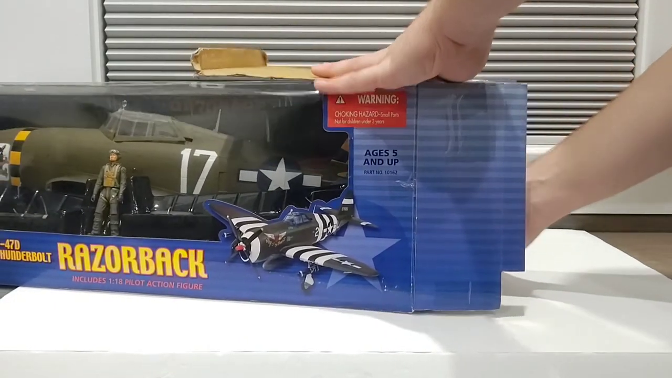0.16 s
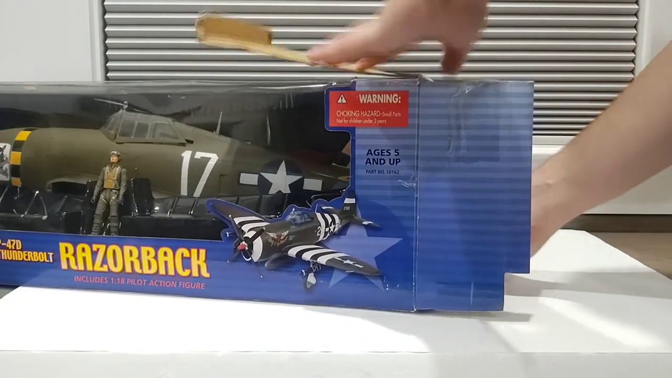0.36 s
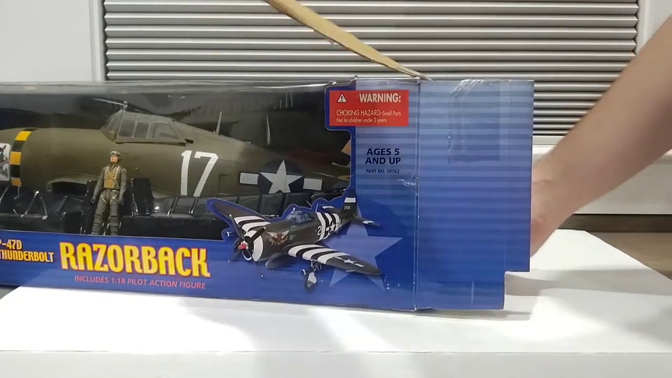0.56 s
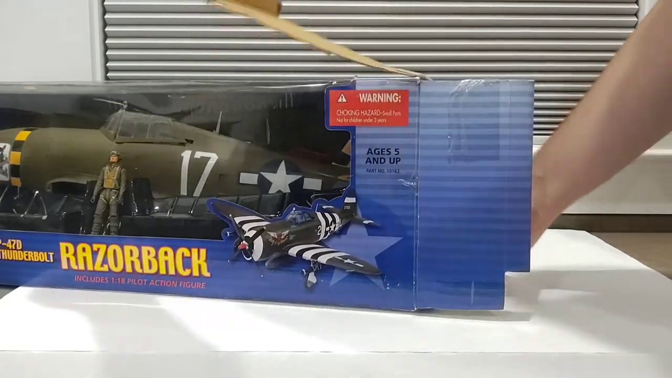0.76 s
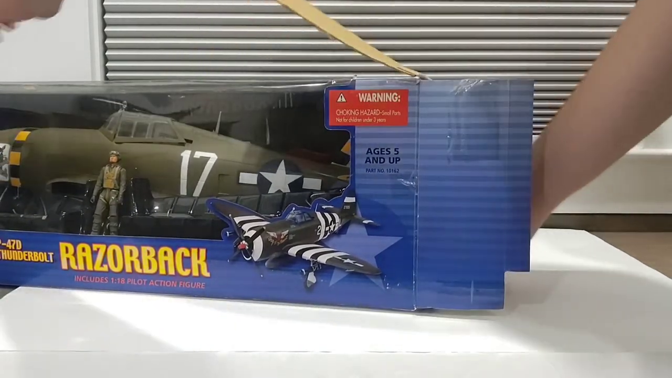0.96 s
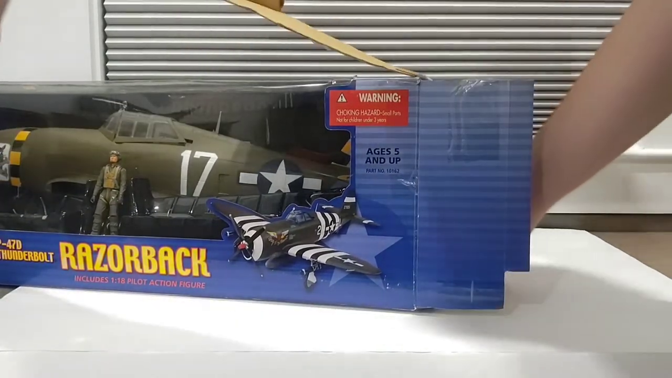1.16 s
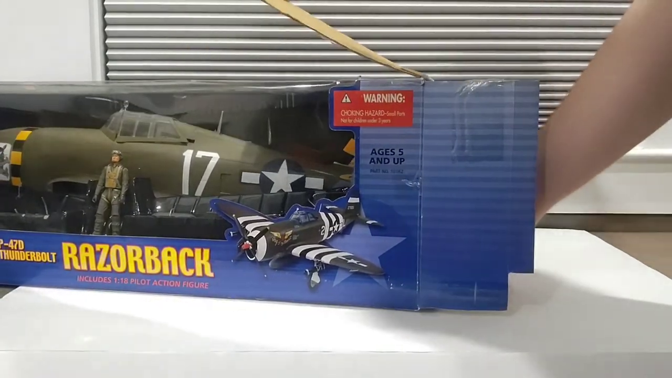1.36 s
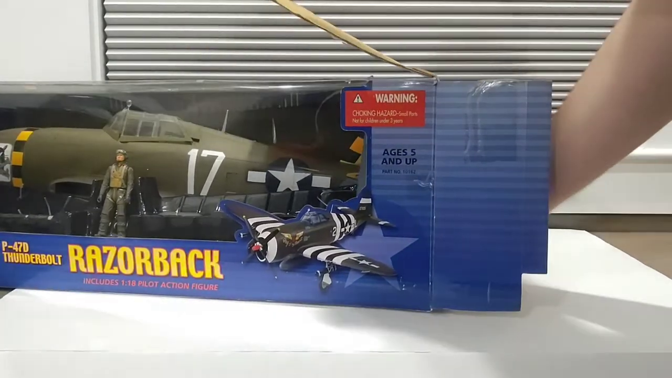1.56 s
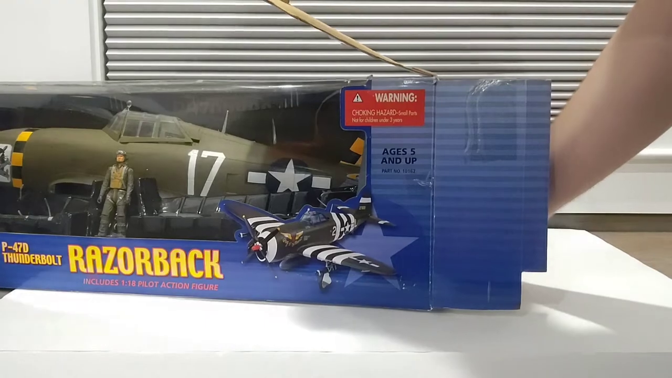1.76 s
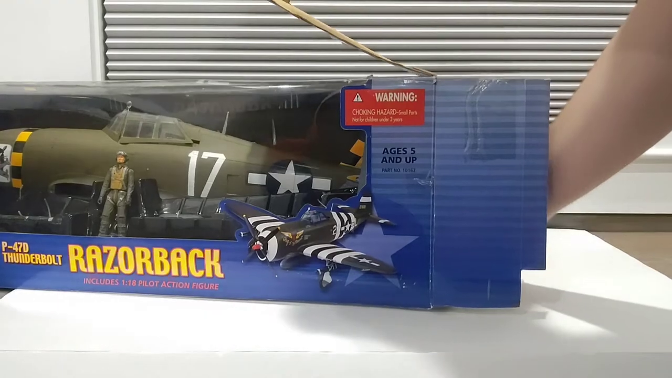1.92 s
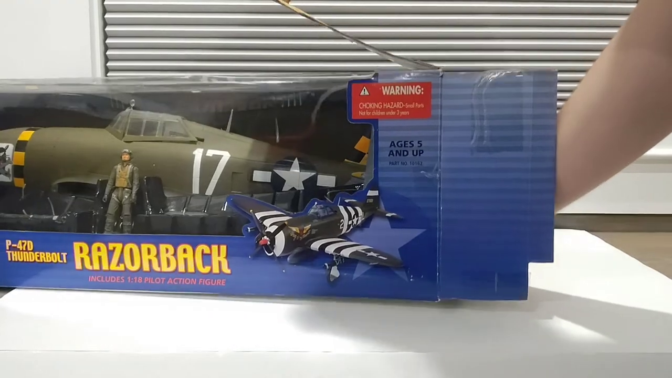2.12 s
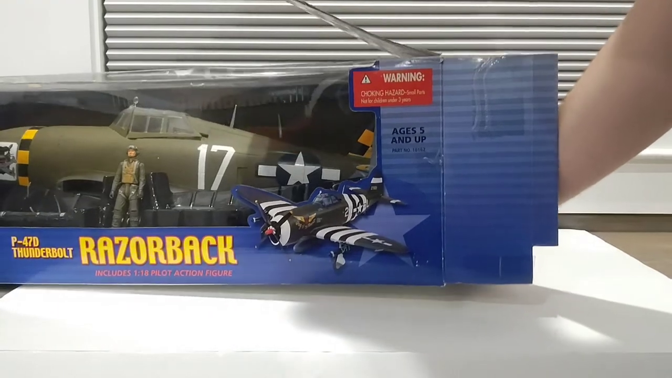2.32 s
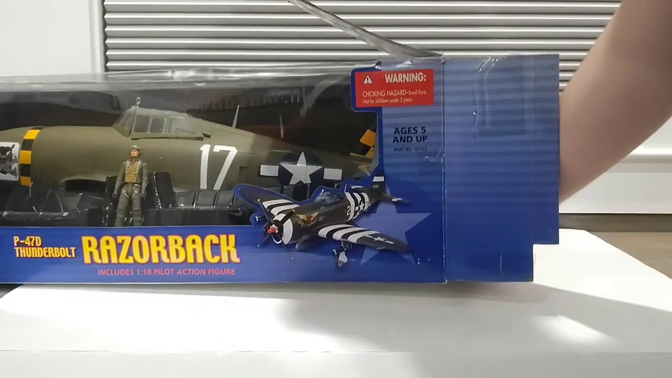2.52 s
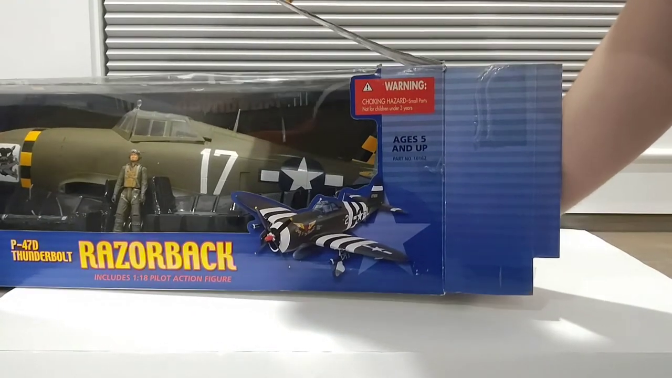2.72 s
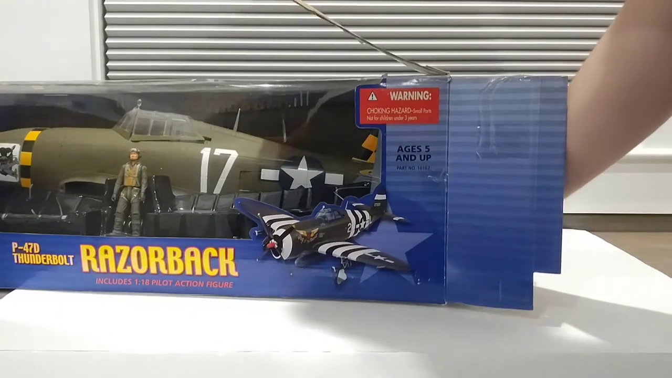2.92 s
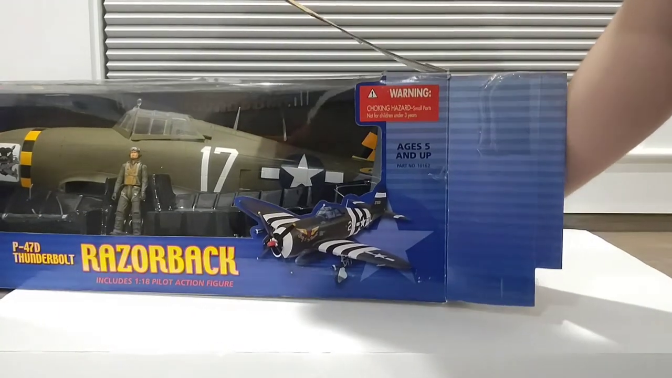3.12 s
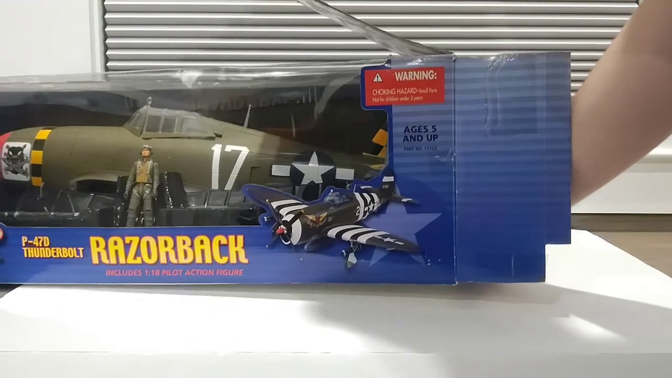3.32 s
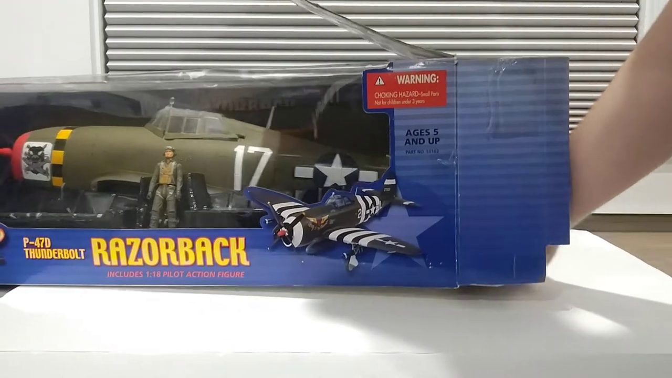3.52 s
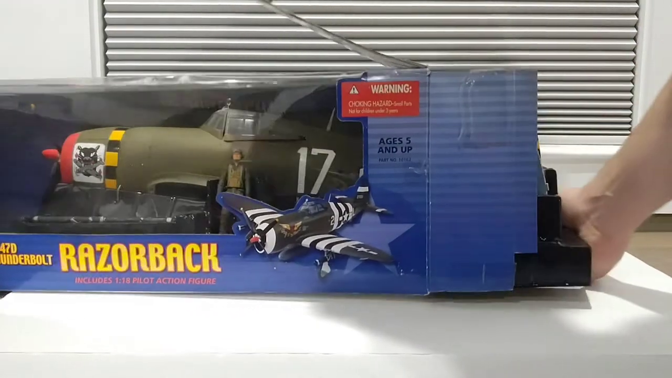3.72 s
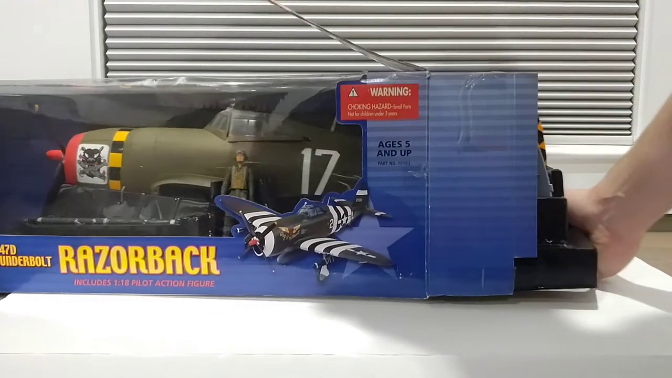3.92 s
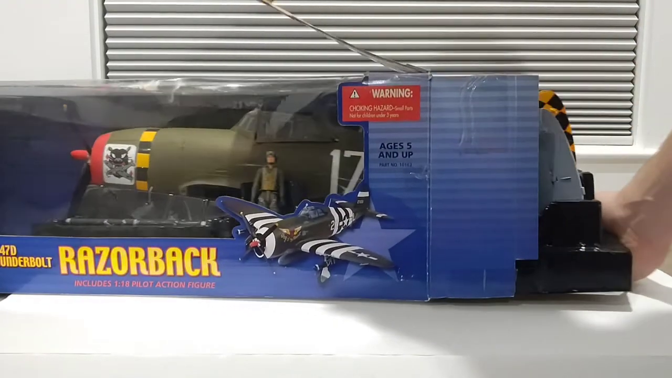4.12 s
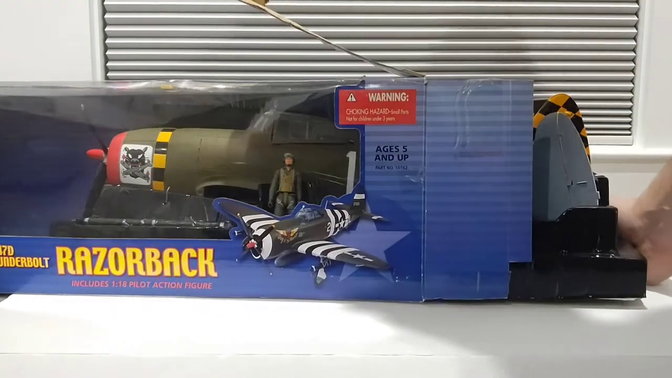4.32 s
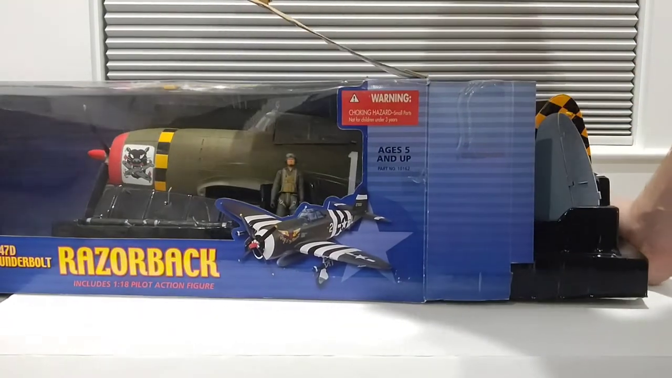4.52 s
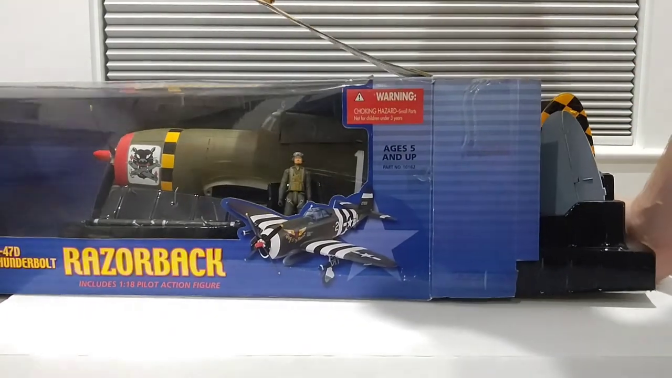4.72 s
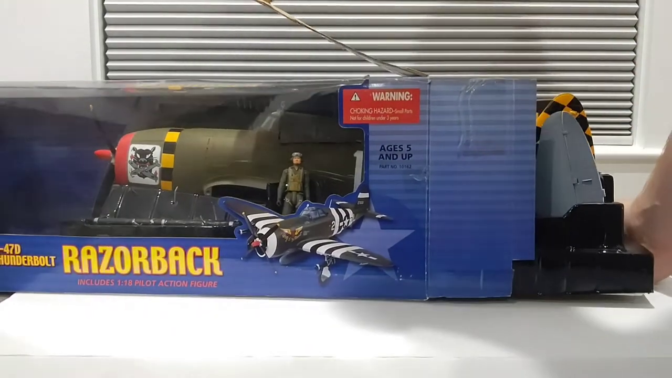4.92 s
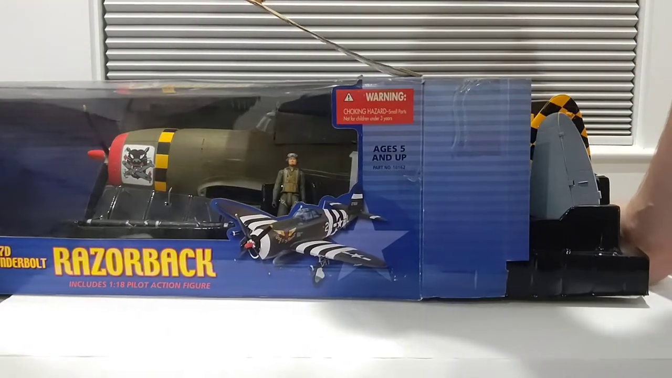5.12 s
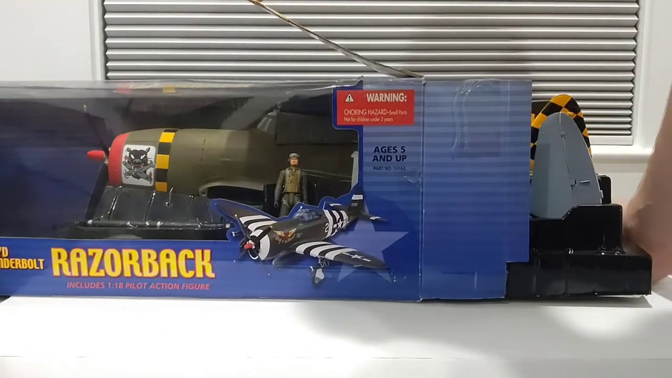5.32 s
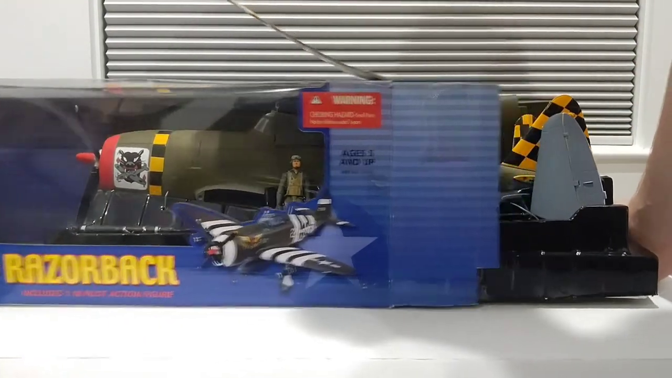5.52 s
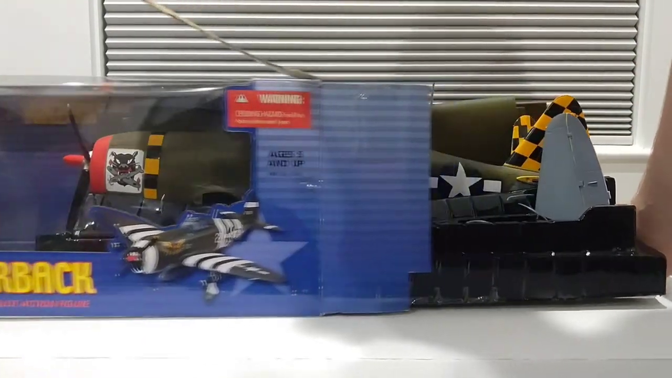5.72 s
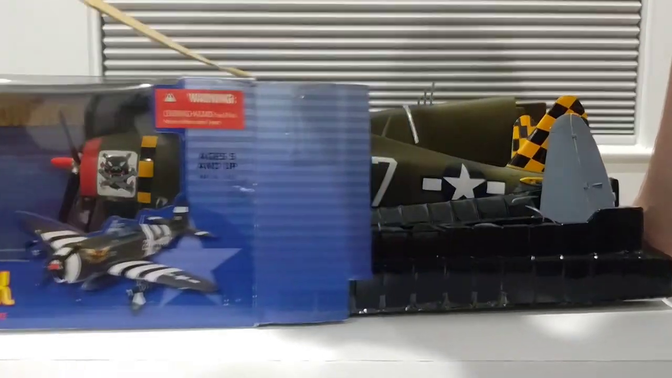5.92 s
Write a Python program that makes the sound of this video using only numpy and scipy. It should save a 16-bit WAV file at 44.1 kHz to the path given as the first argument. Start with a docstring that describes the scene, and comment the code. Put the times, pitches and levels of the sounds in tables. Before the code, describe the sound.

A small, quiet room with a faint low rush of air, heard closely in stereo. From 0 to 0.3 s a palm judders over a hollow cardboard lid in two short stuttering rubs with a soft thud. Until about 1.9 s a hand rummages very quietly: faint rustles, tiny taps, a slightly stronger rub near 1.3-1.5 s. From 1.9 to 3.4 s dry tugs and scuffs gradually strengthen, with a small table bump and crisp plastic ticks. At 3.4 s the plastic tray breaks free in loud, boxy scrapes, with a heavy thud at 3.6 s; a second jerk at 4.0-4.3 s is brighter, ending in clustered clacks and a hard knock at 4.2 s. Then near quiet, a snap at 4.3 s, small crackles and grip rubs from 4.55 s, and short low cardboard groans at 5.1-5.4 s. From 5.4 s a long hissing slide swells to the end, with a dull knock at 5.73 s.

```python
"""First a palm judders over the lid of a long cardboard box on a table in a small room.
A hand rummages inside and tugs, then a plastic tray breaks free and scrapes out in jerks.
The cardboard groans under the grip and the box is drawn off the tray in one long hiss.
Rubbing is shaped noise and slip grains; blows are decaying modes and noise; groans are gliding harmonics.
Two microphones 13 cm apart hear more direct sound than room, over a faint rush of air."""
import sys
import numpy as np
from scipy import signal
from scipy.fft import rfft, irfft, next_fast_len
from scipy.io import wavfile
from scipy.ndimage import uniform_filter1d

SR = 44100
rng = np.random.default_rng(int(sys.argv[2]) if len(sys.argv) > 2 else 0)


def digitize_waveform(pressure):
    """Quantize a signal to 16-bit integers and store it at the path in sys.argv[1].

    Rows of a 2-D input are taken as channels; values are limited to [-1, 1].
    """
    field = np.atleast_2d(pressure).T
    bounded = np.clip(field, -1, 1)
    quanta = np.round(bounded * 32767).astype(np.int16)
    wavfile.write(sys.argv[1], SR, quanta)


N = 263277
SIZE = 2 * next_fast_len(N // 2 + 4096, True)  # padded transform length [samples]
HZ = np.fft.rfftfreq(SIZE, 1 / SR)
TIME = np.arange(N) / SR

# Colour of each kind of rubbing, before the box lifts its modes: (frequency [Hz], level [dB])
PALM_COLOUR = [(40, -21), (130, -17), (260, -8.5), (350, -12), (500, -5), (700, -10), (1050, -5.5),
               (1500, -21), (2000, -17), (2400, -9), (3100, -9), (3900, -12.5), (5800, -7.5), (15000, -17)]
REACH_COLOUR = [(24, -73), (40, -26), (80, -13.5), (280, -4), (350, -6), (397, -6), (797, -5), (1640, -8),
                (2110, -7), (2920, -6.5), (8520, -11), (15500, -19)]
TUG_COLOUR = [(24, -58), (40, -30.5), (162, -15), (247, -9.5), (333, -9.5), (438, -5.5), (797, -13),
              (1130, -14), (1770, -24), (3220, -20), (4800, -15), (8960, -20), (11200, -19), (15500, -29)]
PULL_COLOUR = [(40, -36), (75, -20), (170, -11), (260, -2.5), (400, -1.5), (540, -7), (640, 1.5),
               (850, -3.5), (1200, -2.5), (1900, -7.5), (3000, -17.5), (4200, -22.5), (11200, -29.5),
               (15500, -38)]
GRIP_COLOUR = [(24, -46), (40, -23.5), (103, -15), (287, -1), (427, -3.5), (562, -13), (637, -2.5),
               (797, -11.5), (2010, -19.5), (5050, -29.5), (10100, -32.5), (15500, -37.5)]
DRAW_COLOUR = [(24, -72), (40, -43), (91, -18), (179, -12), (235, -8), (350, -3.5), (407, -3), (548, -13),
               (637, 0.5), (817, -8.5), (1560, -7.5), (1730, -10.5), (10700, -14), (15500, -22.5)]


def rubbing():
    """Hand, cardboard and plastic slide on each other; each pairing has its own colour and grain."""
    jolts = surge()
    palm = rub("palm", PALM_COLOUR, jolts, fall_db_per_s=99, grain_db=-5.0, grains_per_s=310,
               judder_db=-1.4, judder_hz=90, patchy_db=1, brighten=.05, trim_db=-2)
    reach = rub("reach", REACH_COLOUR, jolts, fall_db_per_s=85, grain_db=-9.5, grains_per_s=300,
                judder_db=1.3, judder_hz=40, patchy_db=4.0, brighten=1.0, trim_db=-2.5)
    tug = rub("tug", TUG_COLOUR, jolts, fall_db_per_s=154, grain_db=-4.5, grains_per_s=88,
              judder_db=0.7, judder_hz=30.4, patchy_db=3.5, brighten=.1, trim_db=-2)
    pull = rub("pull", PULL_COLOUR, jolts, fall_db_per_s=116.5, grain_db=-6.5, grains_per_s=300,
               judder_db=1.0, judder_hz=68.5, patchy_db=3.5, brighten=0.19, trim_db=-1.5)
    grip = rub("grip", GRIP_COLOUR, jolts, fall_db_per_s=165, grain_db=-4.5, grains_per_s=360,
               judder_db=1.0, judder_hz=50, patchy_db=3.5, brighten=0.053, trim_db=-2.5)
    draw = rub("draw", DRAW_COLOUR, jolts, fall_db_per_s=80, grain_db=-11, grains_per_s=320,
               judder_db=0.0, judder_hz=59.5, patchy_db=4.5, brighten=0.044, trim_db=-1.54)
    return palm + reach + tug + pull + grip + draw


def rub(kind, colour, surge_db, fall_db_per_s, grain_db, grains_per_s,
        judder_db, judder_hz, patchy_db, brighten, trim_db):
    """Countless tiny slips and fewer large ones come in clumps as the surfaces catch and let go."""
    slip_sizes = amp(3.5 * np.minimum(rng.exponential(1, N), 3))
    slips = (rng.random(N) < grains_per_s / SR) * slip_sizes
    burst = rng.standard_normal((2, 300)) * np.exp(-np.arange(300) / 70)
    # each slip rings the spot it leaves and tears off a short puff of noise
    rings = evened(signal.oaconvolve(slips[None], burst, axes=1)[:, :N])
    puffs = evened(signal.lfilter([1], [1, -.98], slips) * rng.standard_normal((2, N)))
    grains = evened(rings + puffs)
    judder = amp(judder_db * wander(judder_hz))
    drive = (rng.standard_normal((2, N)) + amp(grain_db) * grains) * judder
    spectrum = ports(rfft(patchy(drive, patchy_db), SIZE), HZ) * amp(read(colour, HZ)) * box_gain()

    above_panels = 1 / (1 + (700 / (HZ + 1)) ** 6)
    above_edges = 1 / (1 + (3000 / (HZ + 1)) ** 6)
    thrum = pressed(irfft(spectrum * (1 - above_panels))[:, :N])
    rasp = pressed(irfft(spectrum * (above_panels - above_edges))[:, :N])
    hiss = pressed(irfft(spectrum * above_edges)[:, :N])
    thrum_db, rasp_db, hiss_db = strokes(kind, fall_db_per_s)

    # faster sliding hisses louder and also brighter
    dull = uniform_filter1d(hiss, size=3)
    treble_db = brighten * np.maximum(hiss_db - hiss_db.max() + 8, -15)
    hiss = dull + (hiss - dull) * amp(treble_db)
    # a catch jolts the edges most
    out = thrum * amp(thrum_db + 0.42 * surge_db)
    out += rasp * amp(rasp_db + surge_db)
    out += hiss * amp(hiss_db + 0.17 * surge_db)
    return out * amp(trim_db)


# Strokes of rubbing, before each kind's trim: (start [s], rise [s], hold [s], rasp level [dB],
# panel thrum above rasp [dB], surface hiss above rasp [dB], what rubs)
STROKES = [ (0.0, 0.0051, 0.11, -48.5, -0.5, -20, "palm"), (0.215, 0.037, 0.058, -52.5, 5, -12, "palm"),
           (0.384, 0.05, 0.036, -72.5, 1, 7, "reach"), (0.514, 0.025, 0.093, -78.5, 12.5, -1, "reach"),
           (0.617, 0.043, .012, -68, -3, 4, "reach"), (0.703, 0.087, 0.021, -66, 0.5, 1.5, "reach"),
           (0.92, 0.004, .005, -68.5, 5.5, -4, "reach"), (1.03, 0.023, .01, -76.5, -3, 0, "reach"),
           (1.188, .03, .06, -73.5, -15, 10, "reach"), (1.29, 0.0095, .045, -59, 4, 0, "reach"),
           (1.342, 0.14, 0.014, -57, 4.5, 3.5, "reach"), (1.637, 0.044, .05, -63.5, 0, 3, "reach"),
           (1.765, 0.052, 0.077, -66, 4, 2, "reach"), (1.934, .04, 0.1, -63.5, 1, -3, "tug"),
           (2.006, 0.066, 0.72, -64.5, 1, -9, "tug"), (2.05, 0.031, 0.038, -65.5, 3, -1, "tug"),
           (2.178, 0.013, .005, -62, 6, -3.5, "tug"), (2.26, .03, .04, -59, -4.5, 0, "tug"),
           (2.503, 0.016, 0.02, -61.5, -4, -6.5, "tug"), (2.59, 0.013, 0.018, -65, -6, -5, "tug"),
           (2.66, 0.069, .01, -66, -6, -7, "tug"), (2.823, 0.034, 0.038, -55, 0, -7.5, "tug"),
           (2.92, 0.051, 0.15, -56, 2.5, -6, "tug"), (3.11, .02, 0.033, -58, 6.5, -14, "tug"),
           (3.187, 0.078, 0.047, -53.5, 4.5, -7, "tug"), (3.338, .02, 0.028, -50, -0.5, -12.5, "tug"),
           (3.428, 0.0071, 0.041, -38, 6.5, -5.5, "pull"), (3.479, 0.089, 0.021, -38, 0.5, 0, "pull"),
           (3.593, .01, 0.13, -29.5, 5, -2, "pull"), (3.867, .04, 0.023, -45, -0.5, -11, "pull"),
           (3.932, 0.065, .05, -40.5, -4, -7, "pull"), (4.04, .008, 0.049, -34.5, 1, -5, "pull"),
           (4.117, 0.012, 0.021, -36, 4, 3, "pull"), (4.204, 0.021, 0.065, -37.5, 5, 5, "pull"),
           (4.546, .02, 0.1, -66, 5.5, 0, "grip"), (4.666, 0.026, 0.018, -50, 1.5, -10, "grip"),
           (4.745, 0.025, .02, -50.5, 3, -9.5, "grip"), (4.791, 0.016, 0.064, -46.5, 7.5, -9.5, "grip"),
           (4.948, 0.027, 0.016, -53.5, 4.5, -3, "grip"), (5.006, 0.043, 0.11, -58, 0, -6.5, "grip"),
           (5.143, 0.046, 0.009, -52, 7.5, -8.5, "grip"), (5.222, 0.047, 0.12, -54, 3, -17.5, "grip"),
           (5.374, 0.021, 0.058, -48, 0.5, -15, "grip"), (5.434, 0.16, 0.08, -41, 2, -7.5, "draw"),
           (5.541, 0.32, 0.13, -39.5, 4, 0, "draw")]
HISS_POWER = 1  # the hiss grows with this power of the sliding speed


def strokes(kind, fall_db_per_s):
    """Each stroke speeds up, holds and dies away: levels [dB] of panel thrum, edge rasp and hiss."""
    power = np.zeros((3, N)) + 1e-16
    for start, rise, hold, db, weight, bright, what in STROKES:
        if what == kind:
            age = TIME - start
            fall = amp(-fall_db_per_s * np.maximum(age - rise - hold, 0))
            speed = np.sin(np.pi / 2 * np.clip(age / rise, 0, 1)) * fall
            thrum, rasp = amp(db + weight) * speed, amp(db) * speed
            hiss = amp(db + bright) * speed ** HISS_POWER
            power += np.array([thrum, rasp, hiss]) ** 2
    return 10 * np.log10(power)


# The surfaces catch and let go; thrum and hiss take only a share of the surge:
# (time [s], peak surge of the rasp [dB])
CATCHES = [(0.019, -9), (0.055, 8), (.073, 8), (.11, 3), (.125, 6), (0.144, 9), (.266, 6), (.286, 8),
           (1.409, 5), (3.629, 5), (4.144, 7), (4.379, 15), (4.433, 18), (5.63, 5), (5.682, 5), (5.755, 2),
           (5.825, 0)]


def surge(rise_s=0.0013):
    """Each catch swells fast and dies away, in dB."""
    total_db = np.zeros(N)
    for s, db in CATCHES:
        u = np.maximum(TIME - s, 0) / rise_s
        total_db += db * u * np.exp(1 - np.minimum(u, 20))
    return total_db


def patchy(x, depth_db, size=(3, 7)):
    """The point of contact moves, so different resonances flare up for hundredths of a second."""
    z = signal.stft(x, nperseg=512, noverlap=384)[2]
    field = rng.standard_normal(z.shape[1:])
    field = uniform_filter1d(uniform_filter1d(field, size[0], 0), size[1], 1)
    reach = 1 / (1 + np.fft.rfftfreq(512, 1 / SR)[:, None] / 5000)  # shallower flares in the treble
    return signal.istft(z * amp(depth_db * reach * evened(field)), nperseg=512, noverlap=384)[1][:, :N]


def pressed(x, size=2600):
    """Rubbing at a constant force: unit level, with only the fine texture left."""
    power = uniform_filter1d(uniform_filter1d(x.mean(0) ** 2, size), size // 2)
    return x / np.sqrt(abs(power) + 1e-20)


# Modes of the box with the tray in it, lifting the rubbing and rung by the knocks:
# (frequency [Hz], relative level [dB], 60 dB decay [s])
BOX = [(227, -4, 0.055), (252, -5.5, 0.057), (296, -8, 0.047), (370, -39, 0.027), (410, 2.5, 0.043),
       (495, 1.5, 0.045), (627, -8, 0.16), (719, -7, 0.14), (908, -2.5, 0.072), (1000, 1.5, 0.11),
       (1123, -6.5, 0.014), (1554, -3, 0.011), (2000, -3, 0.0043)]


def box_gain(ring=1.0, width_share=0.83):
    """The box lifts whatever rubs on it near its modes."""
    lift = sum(amp(db) / (1 + ((HZ - hz) * t60 / width_share) ** 2) for hz, db, t60 in BOX)
    return 1 + ring * lift


# Broad resonances of the plastic tray: (frequency [Hz], width [Hz], relative level [dB])
TRAY = [(1020, 300, 1.5), (1524, 470, 8), (2010, 130, 8.5), (2610, 40, 4.5)]
# The tray knocks on the box, levels before the trims of knocks():
# (time [s], thud level [dB], clack level [dB], crack level [dB], pitch of the blow [Hz])
KNOCKS = [(0.183, -48, -49.5, -86, 970), (0.2439, -35.5, -62, -57, 542), (0.3758, -50, -46.5, -86, 617),
          (1.3105, -55, -54, -77, 293), (1.8032, -59, -54.5, -54, 1250), (2.001, -50, -48.5, -66, 550),
          (2.133, -51, -58, -49.5, 410), (2.8735, -46, -63, -61, 1040), (3.2835, -48, -48.5, -46.5, 398),
          (3.4324, -25, -28.5, -43, 420), (3.5998, -16.5, -29, -30.5, 335), (3.718, -23.5, -48, -59, 504),
          (4.045, -29.5, -30.5, -47, 617), (4.1164, -25, -20.5, -29.5, 613),
          (4.1937, -28, -25.5, -30.5, 610), (4.2232, -17, -21, -15, 626), (4.618, -49, -42.5, -81, 410),
          (5.03, -68, -49, -66, 398), (5.068, -65, -46.5, -74, 412), (5.389, -41.5, -51, -81, 497),
          (5.729, -28, -51, -54, 402)]


def knocks(thud_db=-2, ring_db=-9, clack_db=-2, crack_db=-2):
    """A blow pushes the panel a few cycles and rings the box, while the tray clacks and rattles."""
    push_cycles = 0.88  # cycles until the push is strongest
    attack_s, rattle_t60 = .0007, 0.05
    t, out = np.arange(SR // 4) / SR, np.zeros((2, N))
    first = SR // 100  # each part is levelled over its first 10 ms
    onset = 1 - np.exp(-t / attack_s)
    for s, thud, clack, crack, hz in KNOCKS:
        u = hz * t / push_cycles
        push = u * np.exp(-u) * np.sin(2 * np.pi * hz * t)
        ring = np.zeros(len(t))
        for f, db, decay in BOX:
            ring += amp(db - 60 * t / decay) * np.sin(2 * np.pi * (f * t + rng.random()))
        rattle = paired(rng.standard_normal((2, len(t)))) * onset * amp(-60 * t / rattle_t60)
        tray = sum(amp(db) * band(rattle, f - width / 2, f + width / 2, order=1) for f, width, db in TRAY)
        parts = [(push, thud + thud_db),
                 (ring * onset, thud + ring_db),
                 (tray, clack + clack_db),
                 (band(rattle, 2200, 9000, order=1), crack + crack_db)]
        for sound, db in parts:
            add(out, s, amp(db) * sound / sound[..., :first].std())
    return out


# Stick-slip groans of the cardboard, levels before the shimmer:
# (start [s], climb [s], sag [s], top slip rate before jitter [Hz], level [dB])
GROANS = [(5.06, .09, 0.068, 336, -49), (5.224, 0.063, 0.082, 427, -39), (5.306, 0.0295, .09, 335, -47.5)]
# Colour of the groan, before its slope over the harmonics: (frequency [Hz], level [dB])
GROAN_COLOUR = [(150, -35), (280, 0.5), (420, 11.5), (540, -7), (650, 11), (850, -1.5), (1200, -9),
                (2500, -30)]


def groan(jitter=0.17, shimmer_db=9, slope_db=-3, swell=0.86):
    """Regular slips give a tone that climbs as the grip tightens, then sags and breaks up as it lets go."""
    first_pitch, pitch_drop = .8, 0.488  # shares of the top pitch
    out = np.zeros(N)
    for start, climb_s, sag_s, top_hz, db in GROANS:
        climb = np.clip((TIME - start) / climb_s, 0, 1)
        sag = np.clip((TIME - start - climb_s) / sag_s, 0, 1)
        rise = (1 - first_pitch) * np.sin(np.pi / 2 * climb) ** 2
        hz = top_hz * (first_pitch + rise - pitch_drop * sag ** 3)
        rough = np.interp(sag, [0, 1], [.1, .36])  # tightening, then let go
        turns = np.cumsum(hz * (1 + jitter * rough * wander(96))) / SR
        sizes = np.array([amp(read(GROAN_COLOUR, k * hz) + slope_db * np.log2(k)) for k in range(1, 7)])
        tone = sum(size * np.sin(2 * np.pi * k * turns) for k, size in enumerate(sizes, 1))
        tone /= np.sqrt((sizes ** 2).sum(0) / 2)
        envelope = (climb * (1 - sag ** 4)) ** swell
        out += tone * envelope * amp(db + shimmer_db * rough * wander(114))
    return out


# Thin plastic ticks and crinkles: (time [s], level over the first 5 ms [dB], centre pitch [Hz])
TICKS = [(.074, -57, 4130), (.2367, -56.5, 5740), (1.049, -59.5, 8000), (1.6686, -55, 6450),
         (2.0807, -50.5, 10600), (2.1336, -48, 10600), (2.2174, -58, 8000), (2.258, -53.5, 6500),
         (2.281, -55, 7190), (2.428, -57.5, 4730), (2.5217, -57, 7000), (2.605, -61, 7000),
         (2.7242, -56, 6000), (2.972, -41, 11100), (3.253, -51.5, 5270), (3.849, -42, 4680),
         (3.892, -45, 6000), (4.333, -35, 6000), (4.548, -54.5, 10300), (4.666, -51, 5350),
         (4.85, -47.5, 4700), (4.7446, -43.5, 4660), (4.9657, -40, 10900)]


def ticks(level_db=0, snap_db=8, spread=1.93):
    """Thin plastic snaps, then buzzes for a moment."""
    buzz_t60, snap_s = .05, .0016
    t, out = np.arange(SR // 8) / SR, np.zeros((2, N))
    for s, db, hz in TICKS:
        fade = amp(-60 * t / buzz_t60) + amp(snap_db) * np.exp(-t / snap_s)
        snap = band(rng.standard_normal((2, len(t))) * fade, hz / spread, hz * spread)
        add(out, s, amp(db + level_db) * snap / snap[:, :SR // 200].std())
    return out


# The box bumps on the table: (time [s], level of the lower mode [dB], its frequency [Hz])
BUMPS = [(.974, -63.5, 77), (1.31, -58, 106), (1.962, -44, 77), (1.994, -52, 86), (3.436, -43, 92),
         (3.603, -31, 93), (4.117, -27.5, 156), (4.223, -29, 144), (4.859, -45, 110)]


def bumps(rise_s=0.0036, upper_db=-3):
    """The table top answers with a short, well damped boom of two modes."""
    table_t60 = .09
    t, out = np.arange(SR // 3) / SR, np.zeros((2, N))
    for s, db, hz in BUMPS:
        boom = np.sin(2 * np.pi * hz * t) + amp(upper_db) * np.sin(2 * np.pi * 1.75 * hz * t)
        add(out, s, amp(db - 60 * t / table_t60) * (1 - np.exp(-t / rise_s)) * boom)
    return out


# Decay of the small room: (frequency [Hz], 60 dB decay [s])
ROOM = [(100, 1), (400, 0.31), (1500, 0.92), (5000, 0.44), (15000, 0.13)]


def room(x, early_db=5):
    """Table and walls return dense reflections, strongest at first, each band dying at its own speed."""
    early_s = .015  # the strongest reflections fade over this time
    size = SR * 3 // 4
    taps = rng.standard_normal((2, size)) * (rng.random((2, size)) < .1)
    taps = taps * (np.arange(size) > SR // 300)  # the direct sound arrives first
    hz, t, z = signal.stft(taps, SR, nperseg=256)
    fade = amp(-60 * t / read(ROOM, hz)[:, None]) * (1 + amp(early_db) * np.exp(-t / early_s))
    tail = paired(signal.istft(z * fade, SR, nperseg=256)[1])
    return signal.fftconvolve(x.mean(0)[None], tail / np.linalg.norm(tail[0]), axes=1)[:, :N]


# Colour of the still room: (frequency [Hz], relative level [dB])
AIR_COLOUR = [(18, -61), (30, 1.5), (140, -12), (410, -7), (518, -35), (691, -15), (1290, -27), (1770, -21),
              (15500, -27)]


def air(level_db=-73.5):
    """The faint steady rush of the room is coloured noise."""
    rush = ports(rfft(rng.standard_normal((2, SIZE))), HZ) * amp(read(AIR_COLOUR, HZ))
    return amp(level_db) * evened(irfft(rush)[:, :N])


def ports(spectrum, hz, spacing_m=.13):
    """Two microphones a hand apart share the long waves and hear the short ones differently."""
    alike = .98 * np.sinc(2 * hz * spacing_m / 343)  # 343 m/s: speed of sound
    mid, side = spectrum * np.sqrt([1 + alike, 1 - alike])
    return np.array([mid + side, mid - side]) / np.sqrt(2)


def paired(x):
    """Two unrelated signals as the two microphones hear them."""
    return irfft(ports(rfft(x), np.fft.rfftfreq(x.shape[1], 1 / SR)), x.shape[1])


def amp(db):
    """Level in dB to amplitude."""
    return 10 ** (np.asarray(db) / 20)


def evened(x):
    """Scales to unit RMS."""
    return x / np.sqrt(np.mean(x ** 2) + 1e-30)


def read(points, hz):
    """Joins (frequency [Hz], value) points on a log-frequency axis."""
    f, value = np.transpose(points)
    return np.interp(np.log(hz + 1), np.log(f + 1), value)


def add(mix, s, sound):
    """Lays a sound into the mix at s seconds."""
    part = mix[:, max(round(s * SR), 0):][:, :sound.shape[-1]]
    part += sound[..., :part.shape[1]]


def band(x, lo_hz, hi_hz, order=2):
    """Band-pass filter."""
    sos = signal.butter(order, [lo_hz, min(hi_hz, .49 * SR)], "band", fs=SR, output="sos")
    return signal.sosfilt(sos, x)


def wander(rate_hz):
    """Slow chance of unit size."""
    return evened(irfft(rfft(rng.standard_normal(SIZE)) / (1 + (HZ / rate_hz) ** 4))[:N])


def scene():
    """All the rubbing and the blows with their reflections, over the air of the room."""
    rubs = rubbing()
    blows = knocks() + ticks() + bumps()
    creak = groan()
    to_room = amp(-12.5) * rubs + amp(-7.0) * blows + amp(-11) * creak
    return rubs + blows + creak + room(to_room) + air()


# Balance of the two microphones: (frequency [Hz], left minus right level [dB])
PORT_BALANCE = [(100, 0), (450, 0.6), (1800, -0.5), (3000, -0.1), (5500, 1.5), (7200, -1.5), (9000, -8.5),
                (11000, -12.5), (15000, -11.5)]


def record(dry):
    """The left microphone is duller than the right; both shed the deep bass and the top treble."""
    ratio = amp(read(PORT_BALANCE, HZ))
    gains = np.array([ratio, np.ones_like(ratio)]) / np.sqrt((1 + ratio ** 2) / 2)
    heard = irfft(rfft(dry, SIZE) * gains)[:, :N]
    heard = signal.sosfilt(signal.butter(4, 62, "high", fs=SR, output="sos"), heard)
    low_pass = signal.firwin(201, 15750, window=("kaiser", 9), fs=SR)
    return signal.oaconvolve(heard, low_pass[None], "same")


dry = scene()
out = record(dry)
digitize_waveform(out)
```